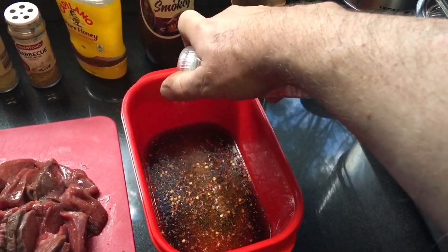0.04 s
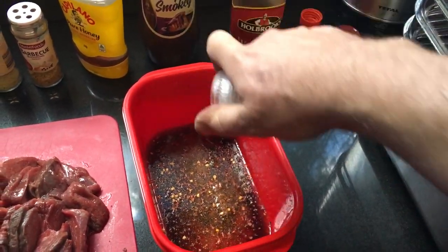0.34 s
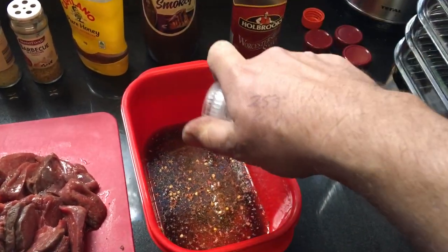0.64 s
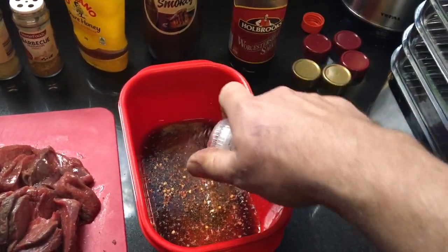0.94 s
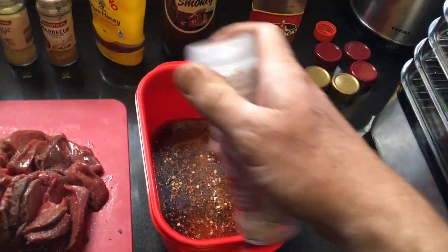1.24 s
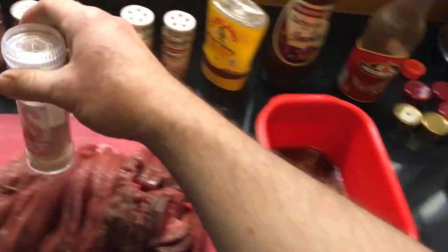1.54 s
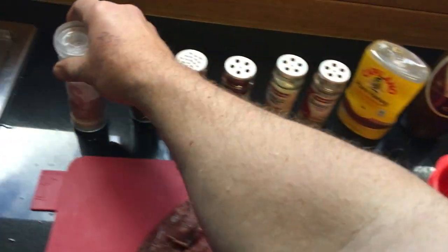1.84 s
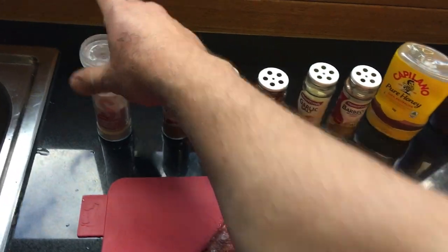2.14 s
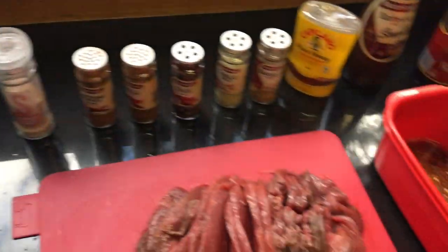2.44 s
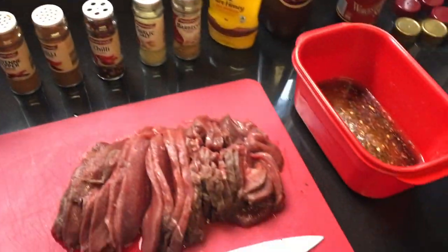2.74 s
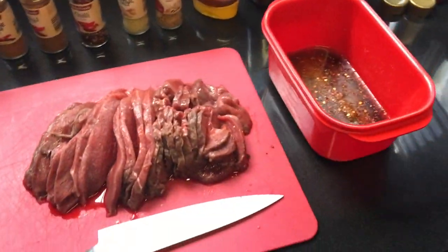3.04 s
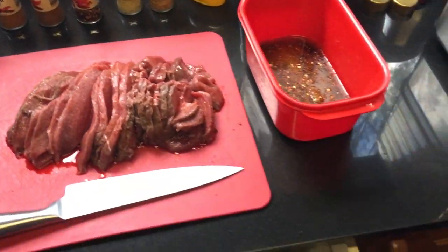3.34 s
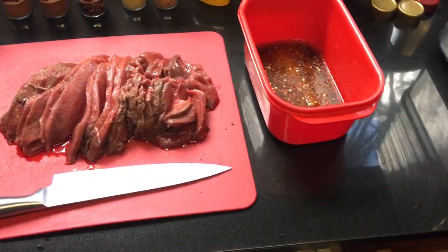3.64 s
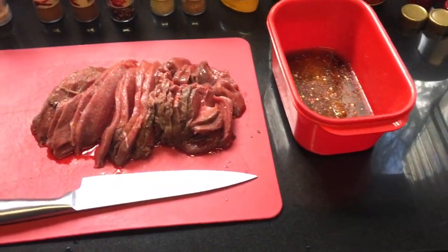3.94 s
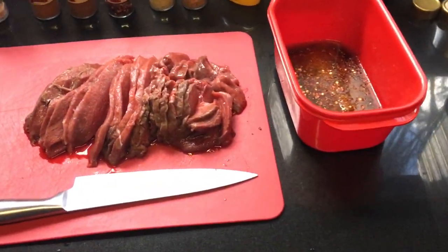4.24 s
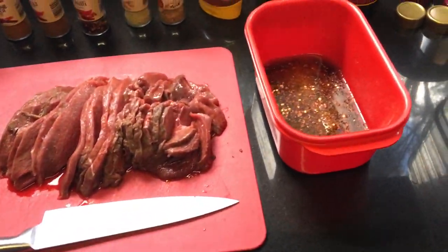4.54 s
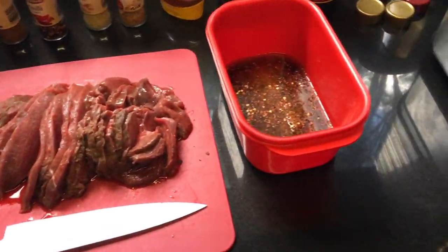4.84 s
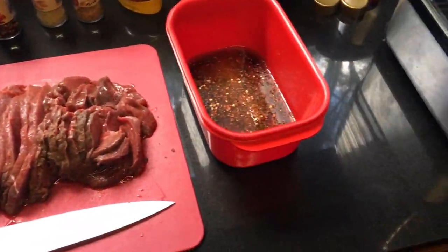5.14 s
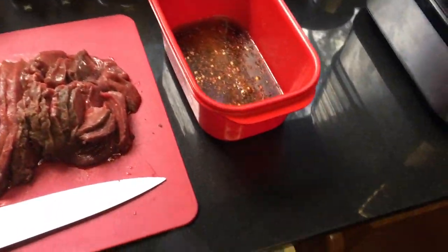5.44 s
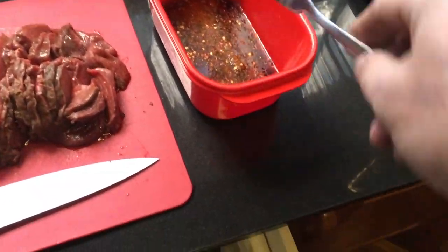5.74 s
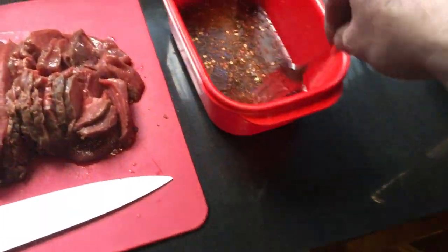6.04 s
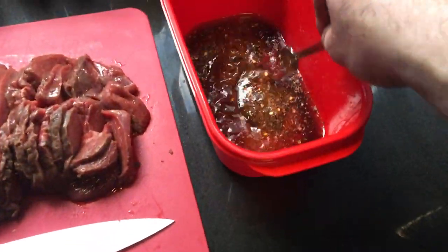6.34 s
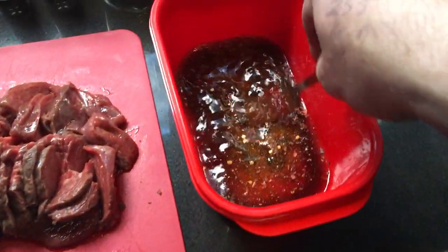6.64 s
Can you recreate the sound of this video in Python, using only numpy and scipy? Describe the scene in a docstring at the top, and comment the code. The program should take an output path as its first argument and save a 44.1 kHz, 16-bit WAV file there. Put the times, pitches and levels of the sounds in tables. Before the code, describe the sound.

Light ticks of falling salt, a sharp knock on a countertop, a rolling drawer and rattling cutlery, then brief wet stirring in plastic.

```python
"""Kitchen bench. Coarse salt ticks and slides from a grinder into a plastic tub of marinade; the grinder
is set down hard on the stone top and rocks to rest. A wooden drawer rumbles open on its rollers, and steel
clinks in the plastic cutlery tray as a fork is picked out. The fork stirs the marinade: tines scrape the
tub, air pockets ring as bubbles, drops spray. Low room hum, arm rustle and a short hard-wall echo."""
import sys
import numpy as np
from scipy import signal
from scipy.fft import rfft, irfft
from scipy.io import wavfile
from scipy.ndimage import uniform_filter1d

SR = 44100
rng = np.random.default_rng(int(sys.argv[2]) if len(sys.argv) > 2 else 0)


def output_pcm(signal):
    """Save a mono or channel-first signal as 16-bit PCM at the path in sys.argv[1].

    Samples are clipped to [-1, 1] before scaling.
    """
    pcm = np.clip(np.atleast_2d(signal).T, -1, 1) * 32767
    wavfile.write(sys.argv[1], SR, np.round(pcm).astype(np.int16))


N = 298998
RING_SAMPLES = 26460
TIME_S, AGE_S = np.arange(N) / SR, np.arange(RING_SAMPLES) / SR
TOP_HZ = 15800


def amp(db):
    """Decibels to gain."""
    return 10 ** (np.asarray(db) / 20)


def unit(x):
    """Scale to energy 1."""
    return x / np.sqrt(np.sum(x ** 2) + 1e-18)


def fade(t60_s):
    """Exponential decay, 60 dB in t60_s."""
    return np.exp(-np.log(1000) * AGE_S / max(t60_s, 1e-4))


def burst(t60_s):
    """Decaying white noise."""
    return rng.standard_normal(RING_SAMPLES) * fade(t60_s)


def through(x, response):
    """Convolve, keeping the length."""
    return signal.fftconvolve(x, response)[:len(x)]


def soften(x, cutoff_hz):
    """Low-pass, as from a softer contact."""
    return signal.sosfilt(signal.butter(2, min(cutoff_hz, TOP_HZ), fs=SR, output="sos"), x)


def tone(colour, size=4096):
    """Minimum-phase response of a (freq_hz, gain_db) curve, falling steeply beyond its ends."""
    hz, db = np.transpose(colour)
    octave, points = np.log2(np.arange(size // 2 + 1) * SR / size + 1), np.log2(hz)
    beyond = np.abs(octave - np.clip(octave, points[0], points[-1]))
    curve_db = np.interp(octave, points, db) - 20 * np.minimum(beyond, 2)
    cepstrum = irfft(np.log(amp(curve_db)))
    cepstrum[1:size // 2] *= 2
    cepstrum[size // 2 + 1:] = 0
    return unit(irfft(np.exp(rfft(cepstrum))))


def dense(colour, crack_t60_s, tail_t60_s, tail_db, snap_db):
    """Struck body with crowded modes: contact snap, short crack, longer tail."""
    blur = unit(burst(crack_t60_s)) + amp(tail_db) * unit(burst(tail_t60_s))
    blur[0] += amp(snap_db)
    return unit(through(blur, tone(colour)))


def ring(modes, scatter_db):
    """Damped modes, weighted anew at each contact."""
    chance = rng.standard_normal((len(modes), 2))
    partials = (np.sign(side) * amp(db + scatter_db * weight) * fade(t60_s) * np.sin(2 * np.pi * hz * AGE_S)
                for (hz, db, t60_s), (weight, side) in zip(modes, chance))
    return unit(sum(partials))


def add(out, start_s, db, response):
    """Mix in one blow; db is the level of a unit-energy response spread over 20 ms."""
    start = max(int(start_s * SR), 0)
    part = response[:max(N - start, 0)]
    out[start:start + len(part)] += amp(db) * np.sqrt(SR / 50) * part


def gesture(start_s, length_s, rise_s, t60_s):
    """Gain of one movement: rise, hold until length_s, decay."""
    since_s = TIME_S - start_s
    rise = np.clip(since_s / max(rise_s, 1e-3), 0, 1)
    return rise * np.exp(-np.log(1000) * np.maximum(since_s - length_s, 0) / max(t60_s, 1e-3))


def waver(per_s, depth_db):
    """Randomly wandering gain."""
    knots = np.clip(rng.standard_normal(N), -2, 2)
    return amp(depth_db * np.interp(TIME_S * per_s, np.arange(N), knots))


def grit(per_s, scatter_db, window=900):
    """Tiny random contacts of uneven size, levelled to a power near 1."""
    clicks = (rng.random(N) < per_s / SR) * np.sign(rng.standard_normal(N))
    clicks *= amp(scatter_db * np.clip(rng.standard_normal(N), -2, 2))
    return clicks / np.sqrt(np.abs(uniform_filter1d(clicks ** 2, window)) + 1e-6)


def ping(hz, cycles, glide, size=6000):
    """One small ring; glide raises its pitch, as in a bubble nearing the surface."""
    life = np.minimum(AGE_S[:size] * hz / cycles, 2)
    phase = 2 * np.pi * np.cumsum(hz * (1 + glide * life)) / SR
    return unit(np.exp(-np.log(1000) * life) * np.sin(phase))


def grains(gain, per_s, hz, octaves, cycles, glide=0):
    """Pings of random moment, size and pitch, following a gain curve."""
    out = np.zeros(N)
    moment, pitch, size = rng.random((3, N))
    for i in np.flatnonzero((moment < per_s / SR) & (gain > 1e-4)):
        db = 20 * np.log10(gain[i] * np.sqrt(350 / per_s) * size[i] ** 3 + 1e-9)
        pitch_hz = min(hz * 2 ** (octaves * (2 * pitch[i] - 1)), TOP_HZ)
        add(out, i / SR, db, ping(pitch_hz, cycles, glide))
    return out


def kitchen():
    """Steady low hum, rustle of a moving arm, faint hiss after the grinder's knock."""
    # spectra: freq_hz, gain_db
    hum_colour = [(22, -21), (53, -6), (147, -13.5), (179, -17.5), (710, -32), (1230, -29), (2500, -44),
                  (6620, -39), (9500, -41), (10500, -46), (16000, -45)]
    rustle_colour = [(100, -2), (450, 2), (800, -3.5), (1400, -3), (2000, -11.5), (4100, -15), (5000, -27),
                     (15000, -43)]
    arm_moves = [(-0.06, 0.15, -59.5, 6000), (1.419, 0.78, -63, 9000), (2.732, 0.46, -61.5, 9050),
                 (3.835, 1, -57.5, 9050), (5.26, 0.94, -61, 13820), (5.889, 0.57, -47, 341)]  # start_s, length_s, relative_db, cutoff_hz
    hum = amp(-62) * through(rng.standard_normal(N), tone(hum_colour))
    rubbing = amp(-70.5) * grit(per_s=1000, scatter_db=-4.5)
    for start_s, length_s, db, cutoff_hz in arm_moves:
        friction = soften(grit(per_s=4200, scatter_db=1), cutoff_hz)
        rubbing += amp(db) * gesture(start_s, length_s, rise_s=0.035, t60_s=0.93) * friction
    hiss = amp(-64) * gesture(1.88, 0.388, rise_s=0.01, t60_s=0.033) * rng.standard_normal(N)
    return hum + through(rubbing, tone(rustle_colour)) + hiss


def salt():
    """Grains crack and land, small ones higher; the rest slide inside the grinder as it tips."""
    # spectra: freq_hz, gain_db
    slide_colour = [(1500, -25), (2400, 1), (3200, -11), (5900, -9.5), (6520, 8.5), (7000, -6),
                    (9500, -8.5), (16000, -14)]
    tick_colour = [(1800, -12.5), (2220, -13.5), (4970, -13), (5700, -6.5), (14600, -15), (16000, -7)]
    slides = [(0.67, 0.028, -68, 0.88), (0.94, 0.1, -70.5, 0.94), (1.16, 0.23, -63, 0.98)]  # start_s, length_s, level_db, pitch_ratio
    ticks = [(0.0144, -25), (0.017, -33), (0.036, -29), (0.046, -27.5), (0.072, -43), (0.089, -39),
             (0.15, -51), (0.33, -50), (0.702, -33.5), (0.747, -47), (0.78, -34.5), (0.793, -37),
             (0.887, -39)]  # start_s, relative_db
    trickle = amp(-81) * gesture(0, 1.4, rise_s=0, t60_s=0.58)
    out = grains(trickle, per_s=45, hz=11500, octaves=0.4, cycles=5)
    flow = grit(per_s=900, scatter_db=3.5) * waver(per_s=32, depth_db=3)
    for start_s, length_s, db, pitch_ratio in slides:
        colour = [(hz * pitch_ratio, gain_db) for hz, gain_db in slide_colour]
        tilt = gesture(start_s, length_s, rise_s=0.46 * length_s, t60_s=0.58)
        out += amp(db) * through(flow * tilt, tone(colour))
    for start_s, db in ticks:
        pitch_ratio = np.clip(2 ** ((-31 - db) / 12), 1, 2)
        colour = [(hz * pitch_ratio, gain_db) for hz, gain_db in tick_colour]
        add(out, start_s, db - 21.5, dense(colour, 0.008, 0.11, tail_db=-0.5, snap_db=-15))
    return out


def grinder():
    """Base hits stone: dry crack, brief dull ring, softer contacts as it rocks to rest."""
    contacts = [(1.48, -56.5, 800), (1.876, -16.5, 13700), (1.885, -27.5, 3080), (1.892, -33.5, 694),
                (1.927, -40, 2220), (2.032, -40.5, 1130), (2.046, -40.5, 603), (2.26, -53.5, 710)]  # start_s, relative_db, cutoff_hz
    body_colour = [(70, -46), (125, -13), (200, -6), (700, -3), (1050, -1.5), (1500, -4), (2000, -2),
                   (2950, -4), (3600, -10), (4400, -13), (5100, -21), (9000, -25), (16000, -32)]  # freq_hz, gain_db
    # resonances: freq_hz, gain_db, t60_s
    crack_modes = [(1030, -3, 0.006), (2750, -4, 0.007)]
    body_modes = [(200, -7, .18), (540, -4, .15), (812, -3, .2), (1034, -3, .16), (1245, 0, .17),
                  (1933, 3, .17), (2460, 2, .13), (2759, -1, .1), (2950, 0, .09)]
    out = np.zeros(N)
    for start_s, db, cutoff_hz in contacts:
        crack = dense(body_colour, 0.0085, 0.18, tail_db=-2.5, snap_db=-1)
        crack += amp(-8.5) * ring(crack_modes, scatter_db=1.5)
        shell = unit(through(burst(t60_s=0.37), tone(body_colour)))
        tail = soften(shell + amp(-0.5) * ring(body_modes, scatter_db=-0.5), cutoff_hz=2488)
        add(out, start_s, db, unit(soften(crack + amp(-8) * tail, cutoff_hz)))
    return out


def drawer_speed():
    """Share of full speed: eased open, tugged, then braked evenly by friction."""
    ease_s, tug_s, stop_s, rise_s = 3.07, 3.15, 3.825, 0.11
    eased, tugged = (np.clip((TIME_S - start_s) / rise_s, 0, 1) for start_s in (ease_s, tug_s))
    braking = np.clip((stop_s - TIME_S) / (stop_s - tug_s - rise_s), 0, 1)
    return np.maximum(0.51 * eased, tugged) * braking


def rattle(colour, per_s, spots=4):
    """Small contacts at several spots, each ringing a little differently."""
    out = np.zeros(N)
    for _ in range(spots):
        contacts = grit(per_s / spots, scatter_db=11)
        out += through(contacts, dense(colour, 0.015, 0.021, tail_db=-0.5, snap_db=-1))
    return out / np.sqrt(spots)


def drawer():
    """Rollers rumble through the wooden box; the hand bumps it, the runners rattle, jolt and scrape."""
    # spectra: freq_hz, gain_db
    rumble_colour = [(40, -3), (86, -11), (113, 5.5), (172, -2.5), (199, 7), (256, -9), (285, 7),
                     (483, -17), (551, -4.5), (700, -27)]
    rattle_colour = [(260, -19), (450, -6.5), (665, -0.5), (1120, 3), (1800, -5), (2810, -13.5),
                     (6000, -16), (9000, -19)]
    bump_colour = [(40, -9), (80, -14), (160, -11), (290, -12.5), (450, -18.5), (1000, -26), (4000, -30.5),
                   (15000, -39)]
    bumps = [(2.515, -37.5, 13970), (2.543, -37, 13850), (2.581, -39, 400), (2.756, -36, 298),
             (2.979, -33, 9000), (3.097, -28.5, 1510), (3.155, -13, 3470), (3.168, -17, 220),
             (3.514, -19.5, 3070)]  # start_s, relative_db, cutoff_hz
    jolts = [(3.077, -32.5), (3.15, -23), (3.33, -31), (3.511, -27.5), (3.523, -40)]  # start_s, relative_db
    speed = drawer_speed()
    end_scrape = amp(-37) * gesture(3.595, 0.035, rise_s=0.029, t60_s=0.24)
    out = amp(-30.5) * speed ** 1.82 * through(grit(per_s=390, scatter_db=3), tone(rumble_colour))
    out += (amp(-41.5) * speed ** 2.05 + end_scrape) * rattle(rattle_colour, per_s=260)
    out *= waver(per_s=28, depth_db=3)
    for start_s, db, cutoff_hz in bumps:
        bump = dense(bump_colour, 0.12, 0.54, tail_db=2.5, snap_db=-7.5)
        add(out, start_s, db - 13, unit(soften(bump, cutoff_hz)))
    for start_s, db in jolts:
        jolt = dense(rattle_colour, 0.11, 0.52, tail_db=11.5, snap_db=-7)
        add(out, start_s, db - 4.5, soften(jolt, cutoff_hz=5900))
    return out


def steel():
    """Bright ring of cutlery: partials the pieces nearly share, plus others unique to each."""
    steel_colour = [(880, -8.5), (1500, 0.5), (2000, -4), (2300, 8), (2460, -12.5), (3000, 0), (5120, -3.5),
                    (5880, 6), (6500, -3.5), (9280, 5), (10200, -3.5), (11500, 1), (12700, 2), (13800, 2.5),
                    (16000, -4)]  # freq_hz, gain_db
    steel_modes = [(2459, -8, .25), (3341, -6, .2), (5868, -6, .15), (6080, -6, .15), (8480, -2, .17),
                   (9566, -1, .16), (11198, 0, .18), (11860, 0, .18), (12184, 0, .2), (13775, 0, .17),
                   (13875, 1, .17)]  # freq_hz, gain_db, t60_s
    alike = [(hz * (1 + 0.012 * (rng.random() - 0.5)), db, t60_s) for hz, db, t60_s in steel_modes]
    own = [(hz, 0, 0.17) for hz in rng.uniform(4000, TOP_HZ, 16)]
    partials = amp(-10) * ring(alike, scatter_db=3) + amp(-9) * ring(own, scatter_db=2.5)
    return unit(dense(steel_colour, 0.05, 0.14, tail_db=-2.5, snap_db=-10) + partials)


def tray():
    """Clack of the plastic cutlery tray."""
    tray_colour = [(380, -10), (560, 3), (750, -0.5), (1250, -6.5), (1900, -10), (3500, -19), (7000, -21)]  # freq_hz, gain_db
    tray_modes = [(370, -7, .18), (541, 1, .24), (743, 0, .22), (807, -6, .2), (1080, -8, .18),
                  (1314, -13, .16)]  # freq_hz, gain_db, t60_s
    clack = dense(tray_colour, 0.13, 0.28, tail_db=-3.5, snap_db=-14.5)
    return unit(clack + amp(-5) * ring(tray_modes, scatter_db=13.5))


def box():
    """Hollow boom of the drawer under the tray."""
    box_colour = [(30, -38), (50, -28), (85, -14.5), (140, -26), (210, -2), (265, -8.5), (330, 9.5),
                  (440, -7), (600, -15.5)]  # freq_hz, gain_db
    box_modes = [(196, -12, .26), (322, -2, .18), (347, 0, .21)]  # freq_hz, gain_db, t60_s
    boom = dense(box_colour, 0.16, 0.63, tail_db=-17, snap_db=-2.5)
    return unit(boom + amp(-9) * ring(box_modes, scatter_db=-9))


def cutlery(pieces=3):
    """Pieces moved by drawer and hand clink, slide and knock the tray; the freed fork rings faintly."""
    clinks = [(3.181, -31, -43, -26.5), (3.249, -26.5, -45.5, -33), (3.265, -29.5, -50, -31.5),
              (3.382, -33.5, -40, -49), (3.485, -31, -51, -49), (3.5957, -22.5, -44, -36),
              (3.6663, -22.5, -62, -33.5), (3.693, -36, -53, -42), (4.1647, -32, -34, -24.5),
              (4.1757, -27, -20.5, -21), (4.368, -55, -38.5, -39), (4.3865, -33, -24, -33),
              (4.4022, -24.5, -25, -35.5), (4.6196, -29, -38.5, -30), (4.6658, -27, -23.5, -30),
              (4.6856, -20, -49, -24.5), (4.7228, -9, -19, -16), (4.7316, -16, -17.5, -38),
              (4.771, -36, -38, -21.5), (4.7959, -22, -24, -53), (4.893, -34, -50, -31.5),
              (4.9066, -22, -49, -21), (4.9896, -20, -36, -34.5), (5.0043, -12, -45.5, -25.5),
              (5.0248, -11.5, -14, -12.5), (5.0353, -32.5, -9, -21), (5.044, -14.5, -34.5, -39),
              (5.081, -22, -23, -23.5), (5.163, -35, -32, -29.5), (5.254, -40, -42, -40.5),
              (5.3678, -44.5, -35.5, -40), (5.41, -40.5, -42, -42), (5.5262, -29.5, -28, -22.5),
              (5.5382, -22.5, -26.5, -61.5), (5.602, -54, -25.5, -32), (5.6931, -53, -30.5, -32.5)]  # start_s, steel_relative_db, box_relative_db, tray_relative_db
    pushes = [(3.098, 0.047, 0.1, -47.5, -59), (3.157, 0.04, 0.19, -35, -55),
              (3.421, 0.034, 0.41, -66, -39), (3.586, 0.032, 0.056, -34, -39),
              (3.666, 0.021, 0.054, -38.5, -41), (4.378, 0.032, 0.1, -37.5, -27.5),
              (4.69, 0.096, 0.43, -54.5, -30.5), (4.887, 0.073, 0.35, -31, -29.5),
              (4.989, 0.063, 0.27, -26.5, -31), (5.193, 0.38, 0.94, -68, -53.5)]  # start_s, length_s, t60_s, steel_relative_db, tray_relative_db
    tray_thumps = [(4.1642, -32, 359), (4.176, -30.5, 379), (4.401, -32.5, 492), (5.601, -34, 327),
                   (5.6923, -37, 352.7)]  # start_s, level_db, pitch_hz
    out = np.zeros(N)
    for start_s, steel_db, box_db, tray_db in clinks:
        add(out, start_s, steel_db - 14, steel())
        add(out, start_s, box_db - 10.5, box())
        add(out, start_s, tray_db - 9, tray())
    steel_gain, tray_gain = amp(-51.5) * drawer_speed(), np.zeros(N)
    for start_s, length_s, t60_s, steel_db, tray_db in pushes:
        push = gesture(start_s, length_s, rise_s=0.015, t60_s=t60_s)
        steel_gain = np.maximum(steel_gain, amp(steel_db) * push)
        tray_gain = np.maximum(tray_gain, amp(tray_db) * push)
    for _ in range(pieces):
        contacts = grit(per_s=60, scatter_db=3.5, window=2200) / np.sqrt(pieces)
        out += amp(1) * through(contacts * steel_gain, steel())
        out += through(contacts * tray_gain, amp(-3) * tray() + amp(-4.5) * box())
    # edges and tips barely touching
    out += grains(amp(-10.5) * steel_gain, per_s=1200, hz=10350, octaves=1, cycles=140)
    for start_s, db, hz in tray_thumps:
        add(out, start_s, db, ring([(hz, 0, 0.069), (hz * 2.27, -6, 0.069)], scatter_db=2))
    fork_ring = amp(-62) * gesture(5.044, 0, rise_s=0, t60_s=1.6) * np.sin(2 * np.pi * 10740 * TIME_S)
    return out + fork_ring


def tines(drag_gain):
    """Wet tines drag, tap and skid on the plastic tub, flicking off drops."""
    # spectra: freq_hz, gain_db
    tub_colour = [(45, -10.5), (80, -6.5), (120, 2), (190, 0.5), (240, -2), (330, 1.5), (420, -4.5),
                  (600, -2), (900, -8), (1300, -12.5), (1900, -16.5)]
    tap_colour = [(80, 3), (150, 2), (400, 6.5), (900, 2.5), (1700, -1.5), (3500, -8), (7000, -21),
                  (15000, -60)]
    skid_colour = [(2500, -12), (3700, 1.5), (4700, -9), (5600, 2.5), (7000, 4.5), (9500, -6), (12000, -11),
                   (16000, -5)]
    tine_modes = [(5300, 0, .04), (9050, -2, .06), (11100, -5, .06), (13700, -4, .05)]  # freq_hz, gain_db, t60_s
    taps = [(6.142, -40), (6.181, -42), (6.231, -36), (6.3603, -32)]  # start_s, level_db
    skids = [(6.162, -45, 15000), (6.21, -40.5, 7000), (6.232, -55, 10000), (6.312, -35.5, 15000),
             (6.337, -32.5, 11700), (6.495, -47, 6000), (6.6016, -46.5, 5000)]  # start_s, level_db, cutoff_hz
    friction = grit(per_s=700, scatter_db=6)
    out = drag_gain * through(friction, dense(tub_colour, 0.033, 0.095, tail_db=-3, snap_db=0.5))
    for start_s, db in taps:
        add(out, start_s, db, dense(tap_colour, 0.0067, 0.077, tail_db=2, snap_db=-23))
    for start_s, db, cutoff_hz in skids:
        skid = dense(skid_colour, 0.017, 0.16, tail_db=-1.5, snap_db=-27)
        skid += amp(-6) * ring(tine_modes, scatter_db=-5)
        add(out, start_s, db, unit(soften(skid, cutoff_hz)))
    return out


def plop(hz, bubbles=3):
    """An air pocket breaks into a quick run of bubbles, each higher than the last."""
    out = np.zeros(RING_SAMPLES)
    for k, (gap, pitch) in enumerate(rng.random((bubbles, 2))):
        pop = ping(hz * 2 ** (0.1 * (k + pitch - 1)), cycles=27, glide=0.14)
        start = int(k * (0.5 + gap) * 0.004 * SR)
        out[start:start + len(pop)] += pop / (1 + k / 2)
    return unit(out)


def marinade(spray_gain):
    """Liquid sprays, swirls and closes behind the tines; the tub's walls reflect it and its air rings."""
    air_pockets = [(6.14, -31, 820), (6.236, -27.5, 453), (6.285, -33.5, 1960), (6.297, -32, 1850),
                   (6.31, -26.5, 1800), (6.332, -32, 2030), (6.338, -30, 2850), (6.388, -29.5, 730),
                   (6.399, -42.5, 297), (6.415, -34, 1950), (6.443, -30.5, 1940), (6.452, -30.5, 1710),
                   (6.555, -30, 440), (6.588, -41, 2670), (6.602, -28, 2736), (6.638, -40.5, 1800),
                   (6.68, -38.5, 269)]  # start_s, relative_db, pitch_hz
    cavity_modes = [(1290, -5, .04), (1730, 0, .04), (1840, 0, .04), (2160, 1, .055), (2750, -2, .05),
                    (3700, -8, .035)]  # freq_hz, gain_db, t60_s
    swirl = amp(-48) * gesture(6.14, 0.45, rise_s=0.15, t60_s=0.2)
    droplets = grains(amp(-3) * spray_gain, per_s=1200, hz=7200, octaves=0.92, cycles=17, glide=0.046)
    bubbles = grains(swirl, per_s=800, hz=1920, octaves=1.3, cycles=13, glide=0.22)
    gurgle = grains(swirl, per_s=220, hz=575, octaves=0.8, cycles=10, glide=0.2)
    liquid = droplets + bubbles + gurgle
    for start_s, db, hz in air_pockets:
        add(liquid, start_s, db - 10, plop(hz))
    walls = amp(-3) * unit(burst(t60_s=0.05)) + amp(-16) * ring(cavity_modes, scatter_db=1)
    walls[0] += 1  # direct path
    return through(liquid, walls)


def stirring():
    """Each fork stroke scrapes the bottom of the tub and throws spray."""
    strokes = [(6.129, 0.033, -31.5, -58), (6.145, 0.12, -33.5, -47.5), (6.28, 0.067, -40.5, -43.5),
               (6.361, 0.045, -38.5, -59), (6.43, 0.147, -43.5, -55), (6.583, 0.022, -49, -47.5),
               (6.673, 0.0095, -47, -58.5)]  # start_s, length_s, drag_db, spray_relative_db
    drag_gain, spray_gain = np.zeros(N), np.zeros(N)
    for start_s, length_s, drag_db, spray_db in strokes:
        stroke = gesture(start_s, length_s, rise_s=0.012, t60_s=0.18)
        drag_gain = np.maximum(drag_gain, amp(drag_db) * stroke)
        spray_gain = np.maximum(spray_gain, amp(spray_db) * stroke)
    return tines(drag_gain) + marinade(spray_gain)


def room(x, split_hz=1500):
    """Bench and cupboard reflect treble at once; hard walls add a short echo, longer in the lows."""
    low_pass, high_pass = (signal.butter(2, split_hz, kind, fs=SR, output="sos") for kind in ("low", "high"))
    near = signal.sosfilt(high_pass, unit(burst(t60_s=0.015)))
    diffuse = rng.standard_normal(RING_SAMPLES) * (1 - np.exp(-(AGE_S / 0.019) ** 2))
    lows = signal.sosfilt(low_pass, unit(diffuse * fade(t60_s=0.31)))
    highs = signal.sosfilt(high_pass, unit(diffuse * fade(t60_s=0.22)))
    return x + through(x, amp(-5) * near + amp(-13) * lows - amp(-16) * highs)


def scene():
    """Mono mix: five sources, each with its own room response, over the background."""
    events = sum(room(source()) for source in (salt, grinder, drawer, cutlery, stirring))
    return (events + kitchen())[None]


def record(dry):
    """Microphone path: 33 Hz low cut, clip at full scale, steep top cut."""
    low_cut = signal.butter(2, 33, "high", fs=SR, output="sos")
    top_cut = signal.ellip(10, 0.2, 80, TOP_HZ, fs=SR, output="sos")
    return signal.sosfilt(top_cut, np.clip(signal.sosfilt(low_cut, dry), -1, 1))


dry = scene()
out = record(dry)
output_pcm(out)
```